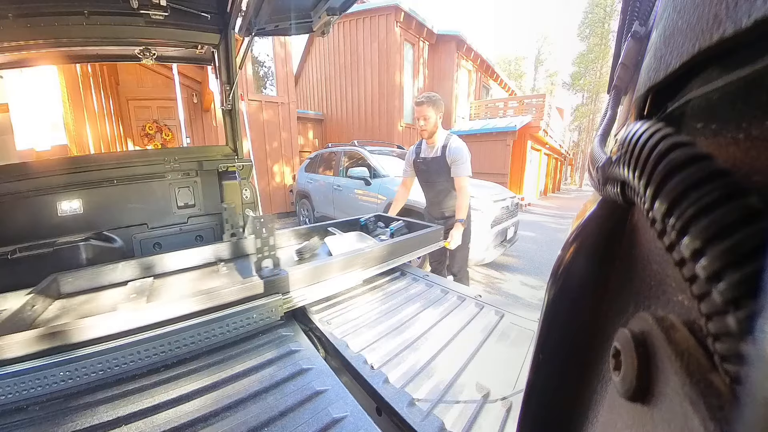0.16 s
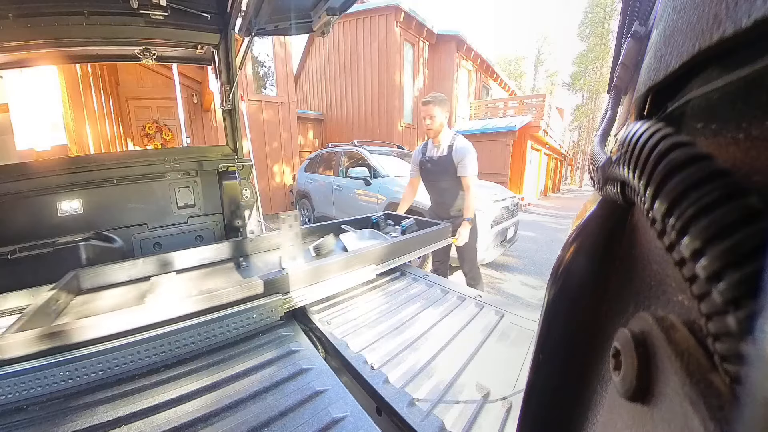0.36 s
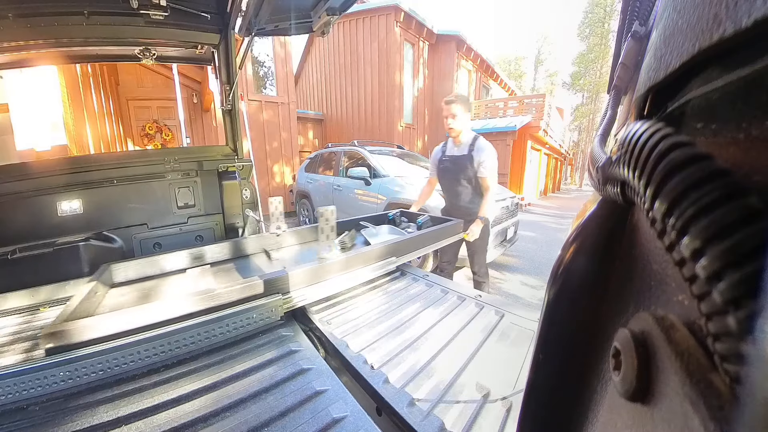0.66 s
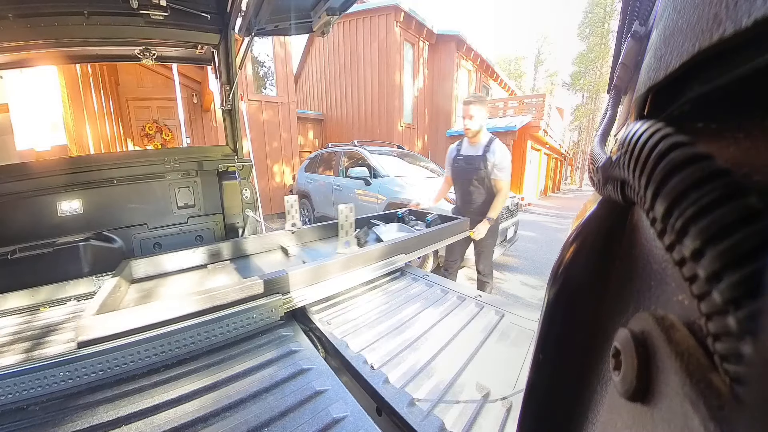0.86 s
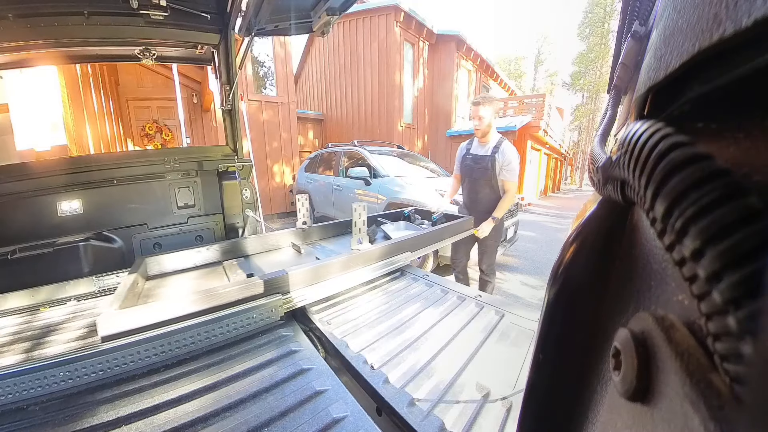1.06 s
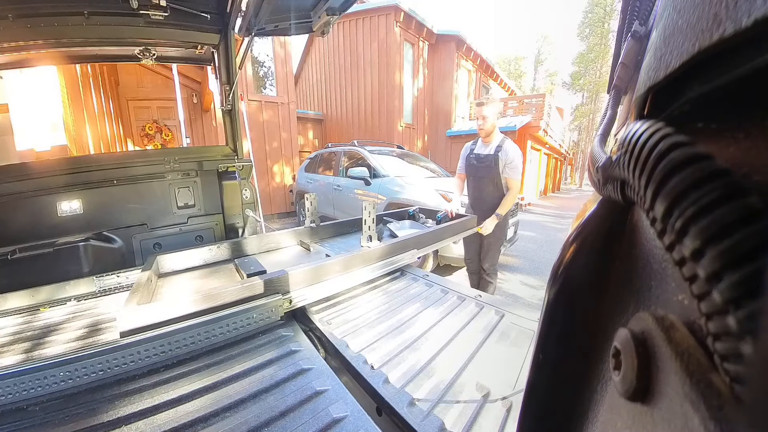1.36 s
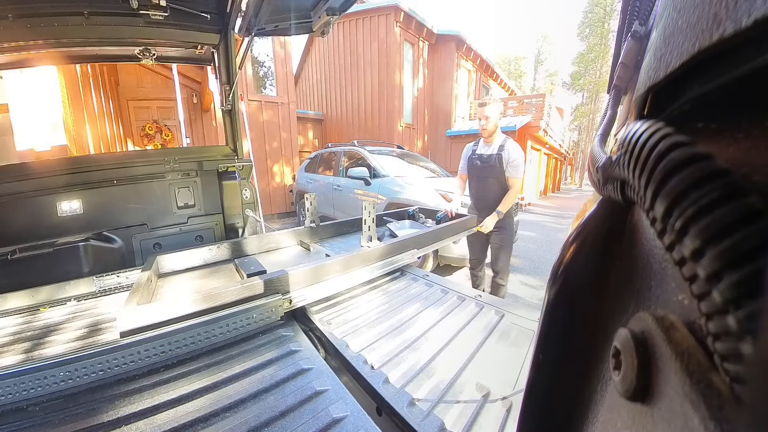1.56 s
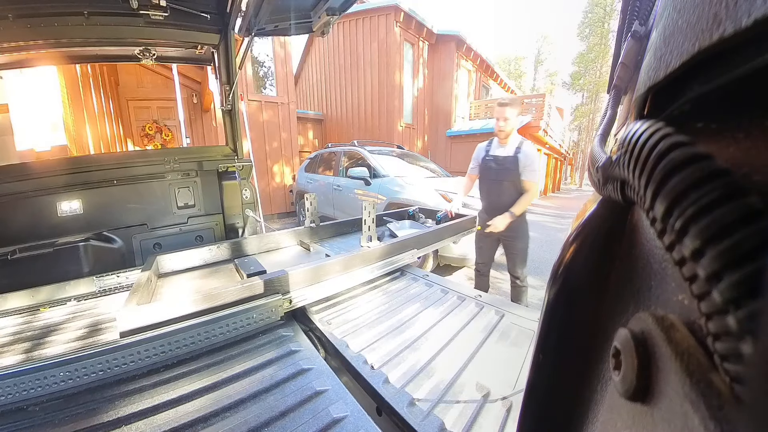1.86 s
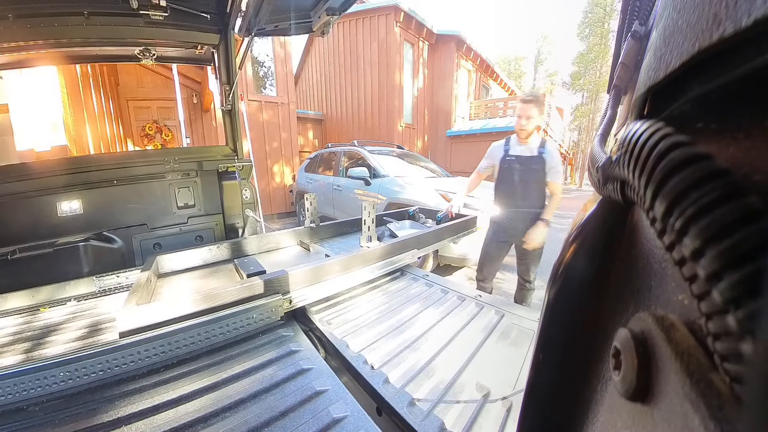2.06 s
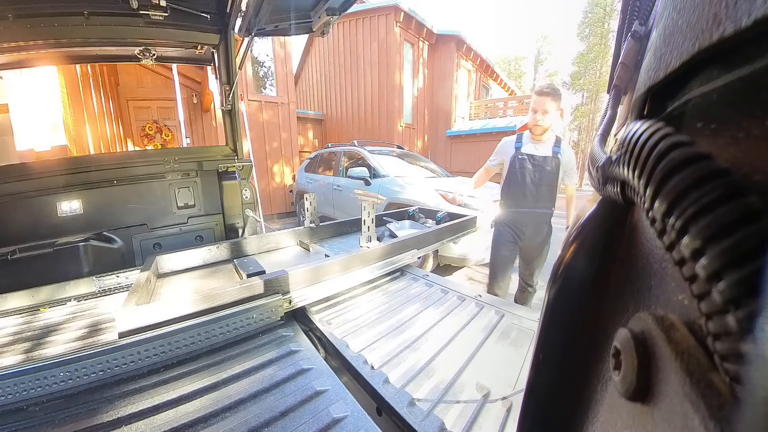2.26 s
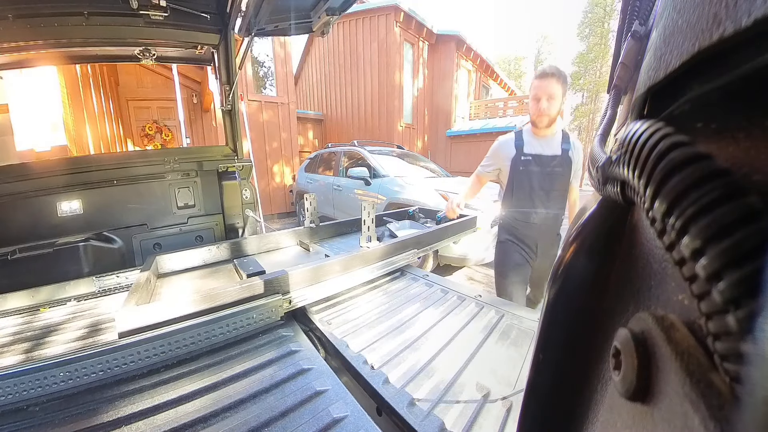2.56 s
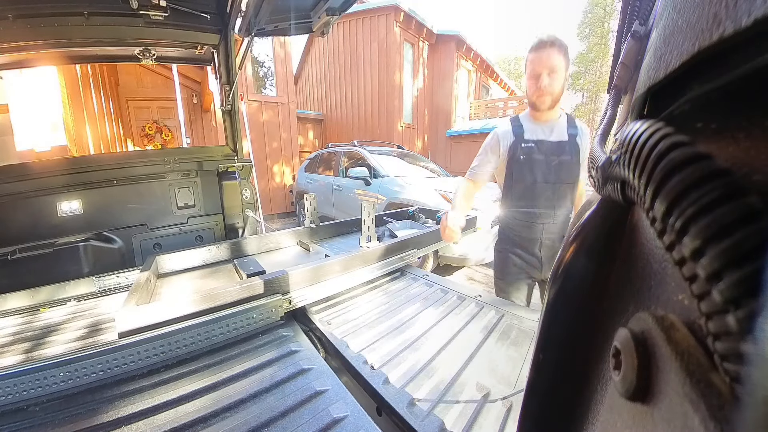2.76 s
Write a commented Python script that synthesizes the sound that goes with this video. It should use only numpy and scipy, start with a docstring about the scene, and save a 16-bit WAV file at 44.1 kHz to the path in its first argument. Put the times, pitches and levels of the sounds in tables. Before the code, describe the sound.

A heavy metal drawer rumbles along its runners in a truck bed, with hissing bearings, rattling knocks and light ticks, then hits its stop with a loud bright clack; close microphone in the bed, faint traffic outdoors.

```python
"""Rumble, hiss and knocks: a heavy metal drawer rolls along its runners in a truck bed, then a shoe scuffs the
yard. Roller bumps ring mode banks of bed, drawer and sheet; bearing grit is coloured noise under level curves.
Knocks and ticks feed contact and rattle noise into the mode banks; a pin and a side panel chatter and ring. The
scuff is coloured grains, the distant traffic coloured noise. The microphone sits in the bed. The sound is
almost mono; only a faint, smeared treble differs between left and right."""
import sys
import numpy as np
from scipy import signal
from scipy.fft import rfft, irfft
from scipy.io import wavfile
from scipy.ndimage import uniform_filter1d

SR = 44100
rng = np.random.default_rng(int(sys.argv[2]) if len(sys.argv) > 2 else 0)


def digitize_waveform(pressure):
    """Quantize a signal to 16-bit integers and store it at the path in sys.argv[1].

    Rows of a 2-D input are taken as channels; values are limited to [-1, 1].
    """
    field = np.atleast_2d(pressure).T
    bounded = np.clip(field, -1, 1)
    quanta = np.round(bounded * 32767).astype(np.int16)
    wavfile.write(sys.argv[1], SR, quanta)


N = 127890

# Clusters of close modes in each part. Each row: centre in Hz, half-spread in Hz, level in dB.
RAIL_MODES = [(5880, 395.5, -9), (6963, 580, 3.5), (7860, 400, -2), (9490, 650, -3.5), (11500, 999, -11),
              (14000, 1500, -21.5)]
LATCH_MODES = [(3340, 430, -5), (4260, 401, 0), (5090, 510, -6.5)]
SHEET_MODES = [(796, 101, 2.5), (1014, 132.5, 0), (1286, 130, 0), (1617, 250, -5.5), (2250, 320.5, -6),
               (2810, 160, -14)]
DRAWER_MODES = [(297, 30, -1.5), (382.5, 50, 1), (495.5, 41, -2), (612.4, 58.4, -6)]
BED_MODES = [(54.4, 5, -10.5), (117, 14, -3.5), (161.7, 22, -0.5), (215, 23, -4.5)]
PART_MODES = (RAIL_MODES, LATCH_MODES, SHEET_MODES, DRAWER_MODES, BED_MODES)


def undb(db):
    """Amplitude factor for a level in dB."""
    return 10 ** (np.asarray(db) / 20)


def unit(x):
    """Scales to an RMS of 1."""
    return x / np.sqrt(np.mean(x ** 2))


def decay(t, t60_s):
    """Exponential fall by 60 dB in t60_s."""
    return np.exp(-np.log(1000) * t / t60_s)


def curve(table, axis):
    """Gain over time from a dB column; -120 dB outside the table."""
    rows = np.array(table)
    t = np.arange(N) / SR
    return undb(np.interp(t, rows[:, 0], rows[:, axis], left=-120, right=-120))


def colour(x, points):
    """Filters noise to (Hz, dB) points, -99 dB beyond the ends; RMS of 1."""
    hz, db = np.array(points).T
    f = np.fft.rfftfreq(N, 1 / SR) + 1
    gain = undb(np.interp(np.log(f), np.log(hz), db, left=-99, right=-99))
    return unit(irfft(rfft(x) * gain, N))


def grains(rate_per_s, scatter_db, smooth):
    """Random small impacts of scattered size over a share of smooth noise."""
    hit = rng.random(N) < rate_per_s / SR
    size = undb(scatter_db * rng.exponential(size=N))
    impacts = hit * size * rng.standard_normal(N)
    return unit(impacts) + smooth * rng.standard_normal(N)


def walk(rate_hz):
    """Slow random drift of RMS 1: held random values, smoothed."""
    hold = int(SR / rate_hz)
    steps = np.repeat(rng.standard_normal(N // hold + 1), hold)
    return unit(uniform_filter1d(steps, hold)[:N])


def modes(clusters, t60_s, count=9):
    """Impulse responses of unevenly spread close modes, one per row, with a soft start."""
    hz, spread_hz, db = np.repeat(np.array(clusters), count, axis=0).T[:, :, None]
    draw = rng.uniform(-1.167, 1, (3,) + hz.shape)
    grid = np.tile(np.linspace(-1, 1, count), len(clusters))[:, None]
    place = grid + draw[0] / count
    hz = hz + spread_hz * place
    t = np.arange(SR // 5) / SR
    fade = decay(t, t60_s * np.exp(0.4 * draw[1])) * (1 - np.exp(-t * hz)) ** 2
    rings = fade * np.sin(2 * np.pi * hz * t + np.pi * draw[2])
    energy = np.sum(rings ** 2, axis=1, keepdims=True)
    return undb(db - 2.1 * place ** 2) * rings / np.sqrt(energy)  # weaker off centre


def ring(rings, spread_db):
    """Unit-energy response to one contact; each strike place reweights the modes in size and sign."""
    size, sign = rng.standard_normal((2, len(rings)))
    response = (undb(spread_db * size) * np.sign(sign)) @ rings
    return response / np.sqrt(np.sum(response ** 2))


def struck(table, blows, rise_s, chatter_db, chatter_s):
    """Each blow is an impulse plus decaying chatter noise, driving damped modes."""
    hz, db, t60_s = np.array(table).T[:, :, None]
    t = np.arange(SR // 5) / SR
    mode_rings = undb(db) * decay(t, t60_s) * np.sin(2 * np.pi * hz * t)
    response = (mode_rings * (1 - np.exp(-t / rise_s))).sum(axis=0)
    push = np.zeros(N)
    for start_s, blow_db in blows:
        i = int(start_s * SR)
        chatter = rng.standard_normal(len(t)) * np.exp(-t / chatter_s)
        push[i:i + len(t)] += undb(blow_db) * (t == 0) + undb(blow_db + chatter_db) * chatter
    return signal.fftconvolve(push, response)[:N]


def town():
    """Distant traffic: coloured noise, wavering a little."""
    # Each row: frequency in Hz, spectrum level in dB per Hz.
    town_colour = [(25, -16.5), (126, -5), (525, -8.5), (781, -8), (1820, -21.5), (2500, -43),
                   (9410, -49.5), (14000, -62)]
    mean_db, waver_db = -48.5, 2.5
    return colour(rng.standard_normal(N), town_colour) * undb(mean_db + waver_db * walk(4))


def scuff():
    """A sole drags over grit: dense coloured grains of uneven level."""
    # Each row: time in seconds, level in dB.
    scuff_level = [(2.195, -75), (2.205, -60), (2.228, -47), (2.24, -46.5), (2.33, -49), (2.39, -56),
                   (2.46, -80)]
    # Each row: frequency in Hz, spectrum level in dB per Hz.
    scuff_colour = [(1600, -11.5), (2500, -3.5), (3200, -12), (4100, -8), (4400, 3), (4750, -9),
                    (6300, -9.5), (7000, -3), (8000, -18), (8700, -7.5), (10500, -16), (11800, -8),
                    (15500, -27)]
    grit = grains(rate_per_s=1500, scatter_db=2.5, smooth=.9)
    return colour(grit, scuff_colour) * curve(scuff_level, axis=1) * undb(1.4 * walk(66))


def side_panel():
    """A side panel rings at two low modes with slow onset."""
    # Each row: mode in Hz, level in dB, T60 in seconds.
    panel_modes = [(373, -5, 0.18), (431, 2, 0.26)]
    # Each row: start in seconds, level in dB.
    panel_blows = [(1.311, -39.5), (1.866, -30)]
    return struck(panel_modes, panel_blows, rise_s=0.0092, chatter_db=-28, chatter_s=.015)


def loose_pin():
    """A loose steel pin chatters briefly and rings at close treble modes."""
    # Each row: mode in Hz, level in dB, T60 in seconds.
    pin_modes = [(3100, -12.5, 0.029), (3816, -4.5, 0.041), (4000, -5.5, 0.045), (4250, -2, 0.0225)]
    # Each row: start in seconds, level in dB.
    pin_blows = [(1.121, -27.5), (2.200, -52.5)]
    return struck(pin_modes, pin_blows, rise_s=.0008, chatter_db=-17, chatter_s=0.017)


def knocks(parts):
    """Each blow is a short contact and a dying rattle at several spots, ringing the parts' modes."""
    # Each row: start in seconds; rail, latch, sheet, drawer and bed levels in dB;
    # rattle against contact in dB, rattle T60 in seconds, build-up in ms.
    knock_rows = [(.031, -43.5, -48, -39.5, -51, -44, 11, 0.18, 5.5),
                  (.300, -49, -50.5, -44.5, -61, -62, -10.5, 1, .3),
                  (.730, -35, -38, -28, -25, -46, -12, 0.14, 0.18),
                  (.833, -36.5, -40.5, -27.5, -38, -39, -2.5, .3, .3),
                  (.861, -31, -36.5, -20, -25, -45, -5, 0.14, 1.1),
                  (.992, -41.5, -44.5, -36.5, -41.5, -47, -11.5, 0.52, .2),
                  (1.119, -32, -35.5, -31.5, -32.5, -34, -7, .15, 1),
                  (1.306, -38, -41.5, -32.5, -30.5, -57.5, -4.5, 0.22, 1.2),
                  (1.458, -13.5, -25.5, -17.5, -21.5, -30, -13, .24, 1.1),
                  (1.753, -77, -80, -41, -51, -60, 11, 0.11, 12),
                  (1.861, -56.5, -60, -38, -29.5, -46, 6, 0.12, 1),
                  (2.230, -34.5, -40, -39.5, -38, -55.5, -6.5, .27, .1)]
    # Light ticks on rail and latch. Each row: start in seconds, rail level in dB.
    tick_rows = [(.478, -48), (0.512, -51.5), (0.66, -53), (.930, -42.5), (1.021, -50), (1.428, -52.5),
                 (1.440, -42.5), (1.590, -44.5), (1.653, -56.5), (1.696, -59)]
    # The next three hold one value each for rail, latch, sheet, drawer and bed.
    # Push rise time in seconds, added to the build-up: lows build up late.
    part_rise_s = [.0006, .0007, .0015, .006, .02]
    # Rattle T60 as a factor.
    part_linger = [0.81, 1.01, 1.031, 1.194, 1.4]
    # Spectral tilt in dB per octave for each dB of blow above -30 dB.
    part_brighter = [.12, 0.0017, 0.21, 0.022, 0.0087]
    tick_latch_db, tick_rattle_db, tick_t60_s = -10, -7, 0.2
    contact_t60_s, rattle_scatter_db, spots = 0.02, 1, 4

    out = np.zeros(N + SR)
    t = np.arange(SR // 3) / SR
    ticks = [(s, db, db + tick_latch_db, None, None, None, tick_rattle_db, tick_t60_s, 0)
             for s, db in tick_rows]
    octaves = [np.log2(np.array(clusters)[:, 0]) for clusters in PART_MODES]
    for start_s, *part_db, rattle_db, t60_s, build_ms in knock_rows + ticks:
        jolts = np.repeat(rng.standard_normal(len(t) // 64 + 1), 64)[:len(t)]
        noise = rng.standard_normal((spots, len(t)))
        rough = unit(noise * undb(rattle_scatter_db * jolts))
        for rings, db, rise_s, linger, brighter, octave in zip(
                parts, part_db, part_rise_s, part_linger, part_brighter, octaves):
            if db is None:
                continue
            tilt = undb(brighter * (db + 30) * octave)
            rings = rings * np.repeat(tilt, len(rings) // len(octave))[:, None]
            contact = decay(t, contact_t60_s)
            rattle = undb(rattle_db) * decay(t, t60_s * linger)
            push = (1 - np.exp(-t / (rise_s + abs(build_ms) / 1000))) * (contact + rattle)
            responses = np.array([ring(rings, spread_db=2.5) for _ in range(spots)])
            # expected peak level, so that db sets the height of the blow
            power = signal.fftconvolve(push ** 2, np.sum(responses ** 2, axis=0))
            top = np.sqrt(power.max())
            blow = signal.fftconvolve(push * rough, responses, axes=1).sum(axis=0)
            i = int(start_s * SR)
            out[i:i + len(blow)] += blow * undb(db) / top
    return out[:N]


def bearing_hiss(roll_level):
    """Grit in the bearings: dense coloured grains of wavering level."""
    # Each row: frequency in Hz, spectrum level in dB per Hz.
    hiss_colour = [(1500, -7.5), (1910, 4), (2440, -24), (2780, -4.5), (3490, -17), (4320, -7.5),
                   (5330, -26), (6000, -21), (7290, -8), (8800, -21), (10100, -12), (13500, -31)]
    grit = grains(rate_per_s=3300, scatter_db=2.5, smooth=1.185)
    hiss = colour(grit, hiss_colour) * undb(2.2 * walk(15))
    return hiss * curve(roll_level, axis=3)


def rolling(parts):
    """Roller bumps ring bed, drawer and sheet from ever new spots; the bearings hiss."""
    # Each row: time in seconds; bed, drawer and bearing hiss levels in dB, bed and drawer before the low-pass.
    roll_level = [(0, -33, -34.5, -54.5), (.12, -34, -33, -60.5), (.38, -31.5, -32.5, -56.5),
                  (.58, -36, -33.5, -60), (.8, -29.5, -34, -55), (1.05, -39.5, -37.5, -64.5),
                  (1.25, -39, -44, -66.5), (1.42, -40, -40, -59.5), (1.45, -40, -30, -53),
                  (1.62, -54, -40, -76), (1.82, -47, -43.5, -81), (2.1, -70, -59.5, -94)]
    sheet_against_drawer_db = -7.5
    spot_step_s, roller_soft_hz = .025, 1270  # time to a new spot; rollers press softly

    boom = np.zeros(N + SR)
    step = int(spot_step_s * SR)
    fade = np.sin(np.pi * np.arange(2 * step) / (2 * step)) ** 2
    drawer_gain = curve(roll_level, axis=2)
    gains = drawer_gain * undb(sheet_against_drawer_db), drawer_gain, curve(roll_level, axis=1)
    for rings, gain in zip(parts[2:], gains):  # sheet, drawer, bed
        impacts = grains(rate_per_s=1100, scatter_db=0.5, smooth=0.64)
        bumps = unit(impacts * undb(1.0 * walk(20))) * gain
        bumps = np.pad(bumps, (step, 0))
        for i in range(0, int(roll_level[-1][0] * SR) + step, step):
            piece = signal.fftconvolve(bumps[i:i + 2 * step] * fade, ring(rings, spread_db=1.32))
            boom[i:i + len(piece)] += piece
    soft = signal.butter(2, roller_soft_hz, fs=SR, output="sos")
    return signal.sosfilt(soft, boom[step:step + N]) + bearing_hiss(roll_level)


def spread(mid):
    """Stereo: smeared treble is added left and subtracted right, with faint treble hiss in it."""
    side_from_hz, side_smear_s, side_db = 3200, .02, -12.5
    side_lift, hiss_db = .4, -66  # treble lift 0-1; hiss level before high-pass and side gain
    t = np.arange(SR // 10) / SR
    smear = rng.standard_normal(len(t)) * np.exp(-t / side_smear_s)
    smear = signal.lfilter([1, -side_lift], [1], smear)
    wide = mid + undb(hiss_db) * rng.standard_normal(N)
    high_pass = signal.ellip(8, .5, 70, side_from_hz, "high", fs=SR, output="sos")
    treble = signal.sosfilt(high_pass, wide)
    side = undb(side_db) * signal.fftconvolve(treble, smear / np.sqrt(np.sum(smear ** 2)))[:N]
    return np.array([mid + side, mid - side])


def scene():
    """Sums all sources in mono, then spreads the treble."""
    # Ring T60 in seconds before scatter, for rail, latch, sheet, drawer and bed.
    ring_t60_s = [.008, .012, .025, .055, .09]
    parts = [modes(clusters, t60_s) for clusters, t60_s in zip(PART_MODES, ring_t60_s)]
    mid = town() + scuff() + side_panel() + loose_pin() + knocks(parts) + rolling(parts)
    return spread(mid)


def record(dry):
    """The microphone loses the deepest bass and the top; a steep low-pass closes above that."""
    mic_low_hz, mic_high_hz, top_hz = 49.4, 13480, 15800
    mic_band = signal.butter(2, [mic_low_hz, mic_high_hz], "band", fs=SR, output="sos")
    heard = signal.sosfilt(mic_band, dry)
    return signal.sosfilt(signal.ellip(10, .2, 80, top_hz, fs=SR, output="sos"), heard)


dry = scene()
out = record(dry)
digitize_waveform(out)
```